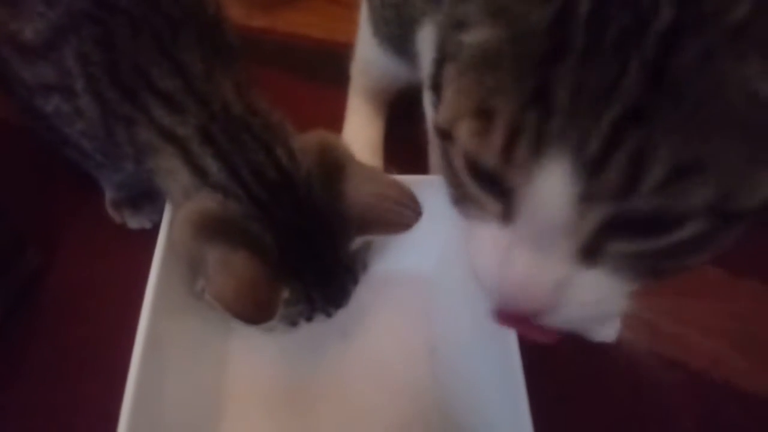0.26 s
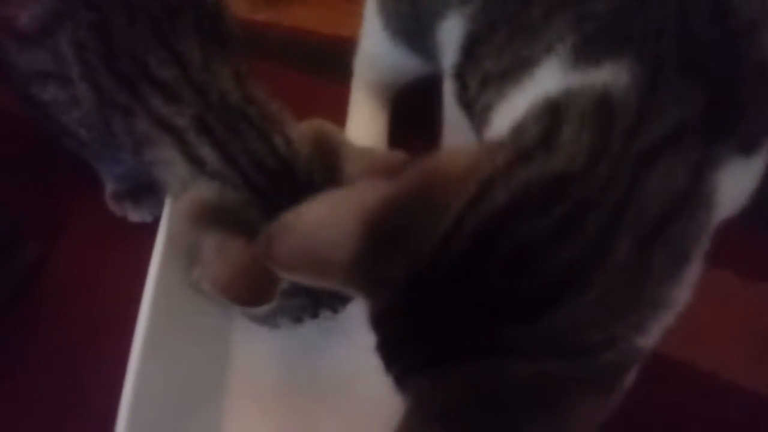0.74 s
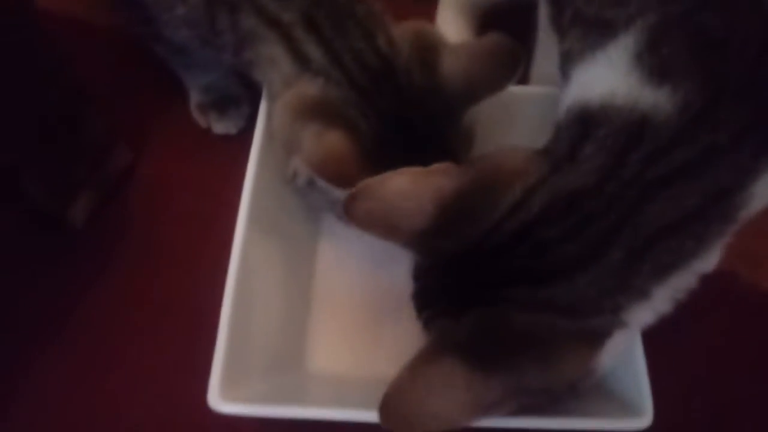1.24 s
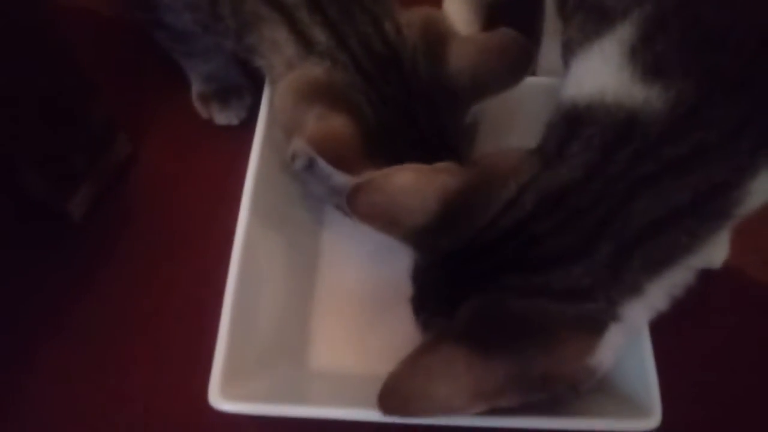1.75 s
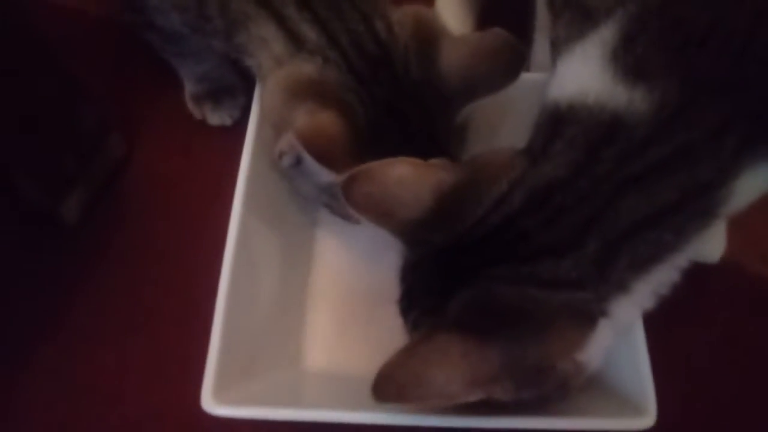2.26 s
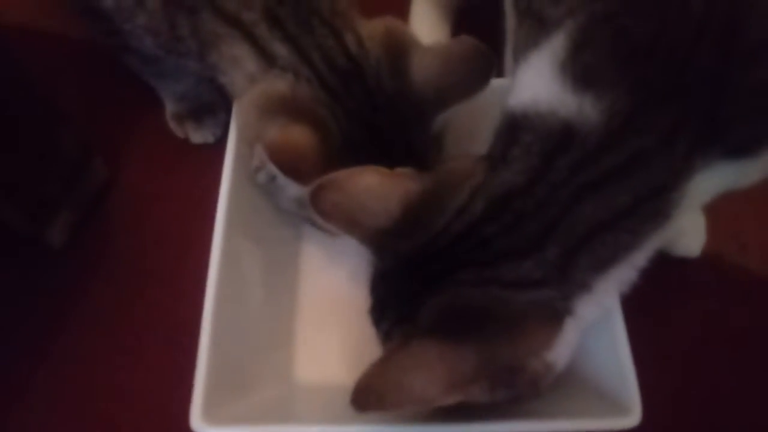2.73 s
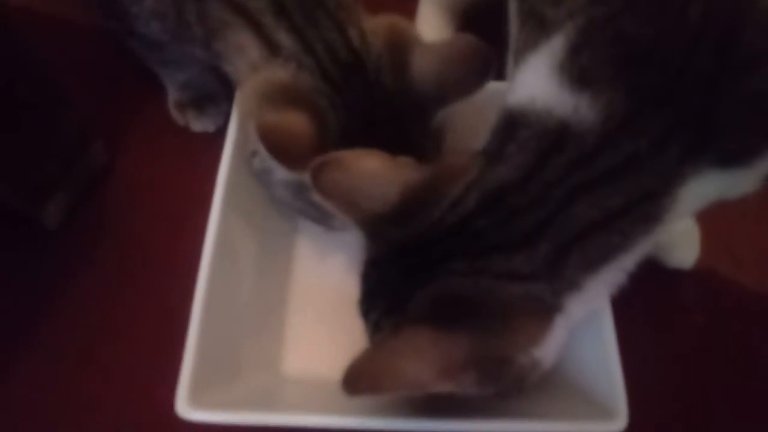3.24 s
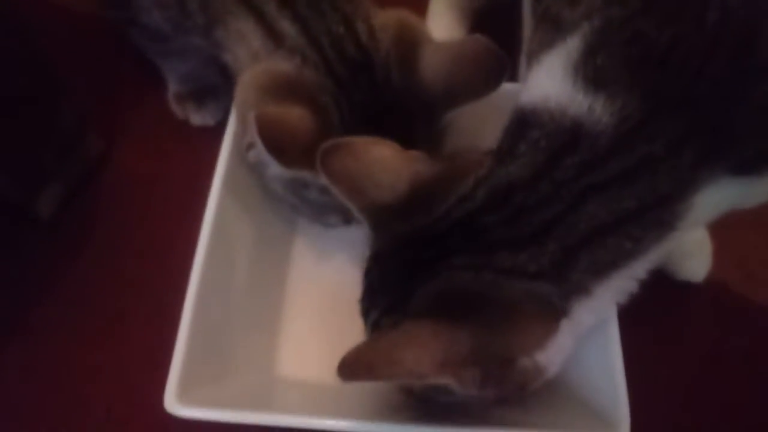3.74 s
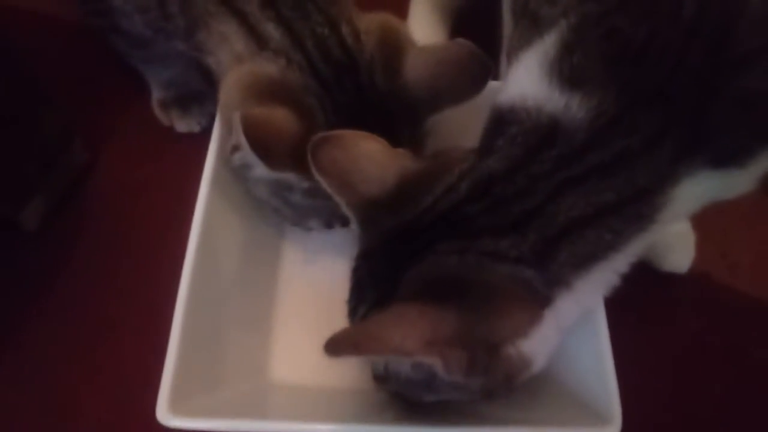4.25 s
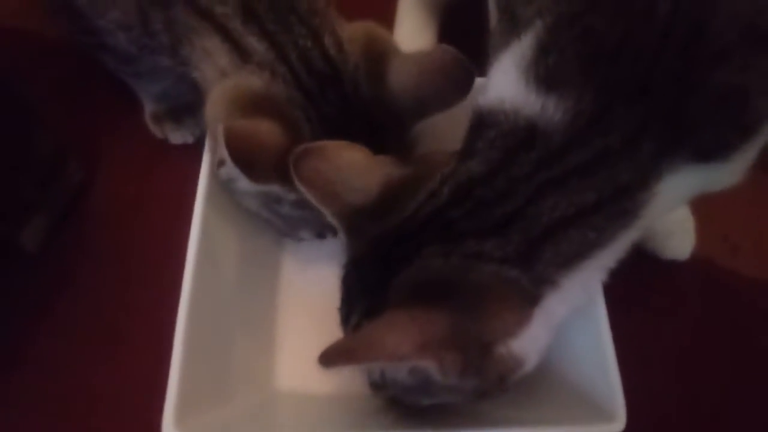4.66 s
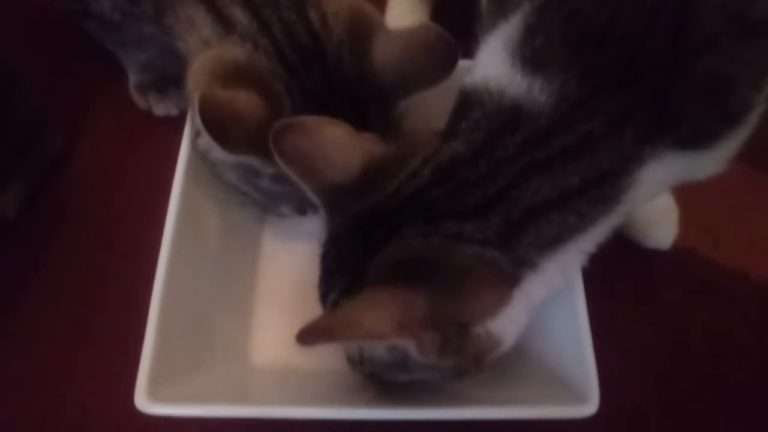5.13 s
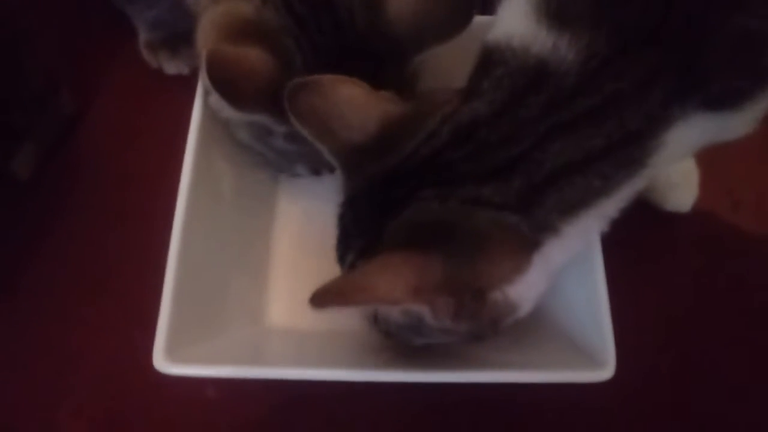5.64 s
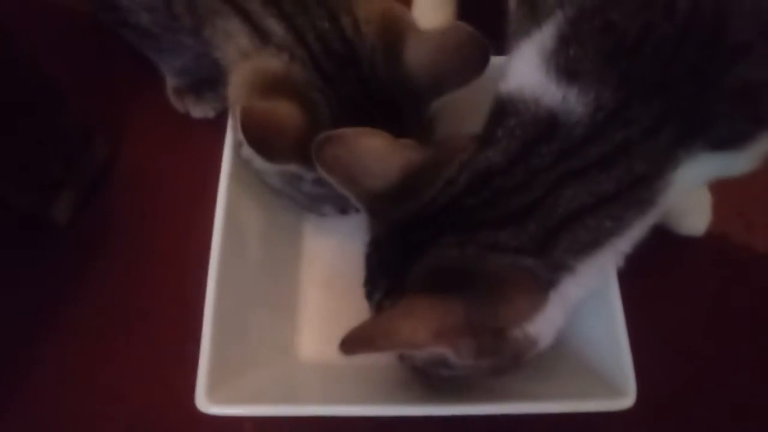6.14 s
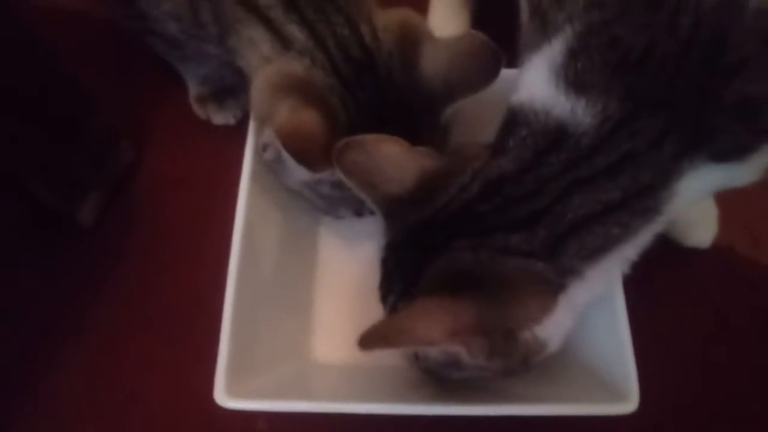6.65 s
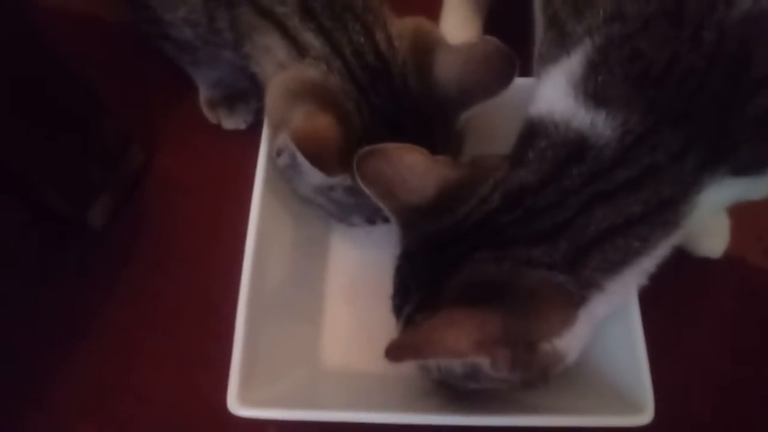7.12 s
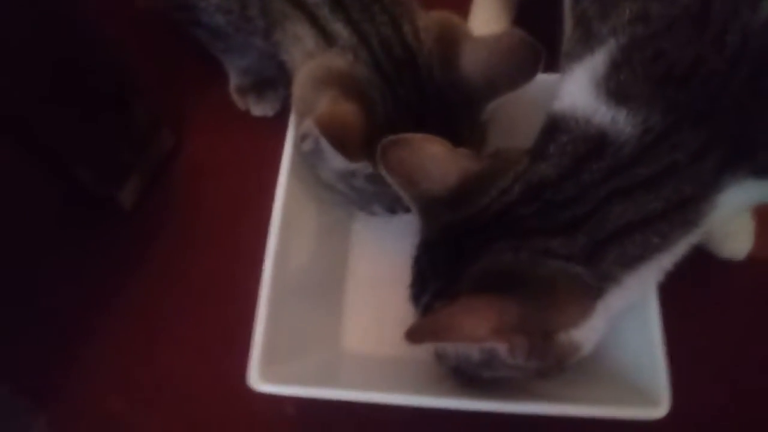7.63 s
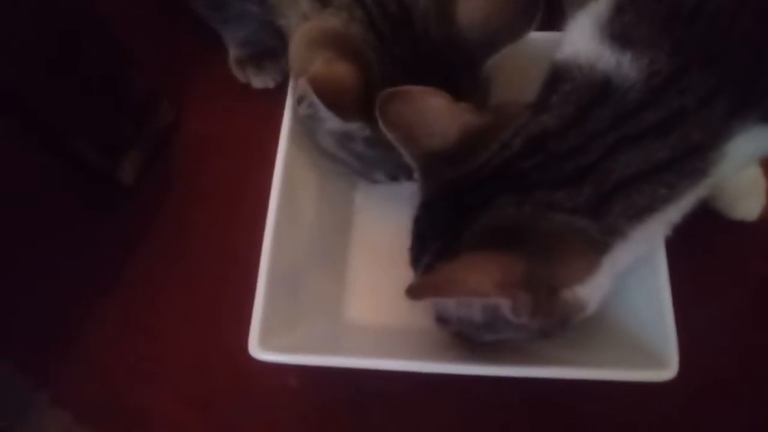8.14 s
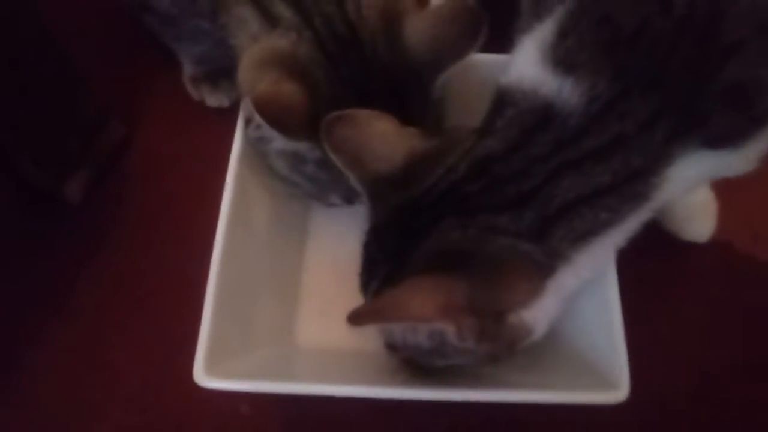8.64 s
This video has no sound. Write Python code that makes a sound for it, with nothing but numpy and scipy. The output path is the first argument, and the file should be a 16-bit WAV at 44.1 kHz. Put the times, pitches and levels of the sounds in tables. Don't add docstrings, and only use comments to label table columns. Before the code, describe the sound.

Two kittens lap milk from a ceramic dish close to a hand-held microphone in a quiet room. Sparse faint ticks come first, then quick irregular wet snaps, little pops and saliva crackle thicken. The sharpest clicks come just after five seconds. Fingers rub and knock the recorder case, low rumble swells later, and soft hiss with a faint electric buzz runs throughout.

```python
import sys
import numpy as np
from scipy import signal
from scipy.fft import rfft, irfft
from scipy.io import wavfile

SR = 44100
rng = np.random.default_rng(int(sys.argv[2]) if len(sys.argv) > 2 else 0)


def natural_amplitude(level_db):
    exponent = np.asarray(level_db, float) / 20
    return 10 ** exponent


def int16_out(signal):
    q = np.round(np.clip(np.atleast_2d(signal).T, -1, 1) * 32767)
    wavfile.write(sys.argv[1], SR, q.astype(np.int16))


N = 391608

# start in seconds, peak in dB, pitch in Hz.
SPRAY_SPECKS = [(1.5435, -48, 8580), (1.797, -39, 15530), (1.8367, -41, 9600), (2.1998, -42.5, 9300),
                (2.325, -43, 8800), (2.472, -41, 15400), (2.701, -47, 15530), (3.1937, -46, 14900),
                (3.207, -44, 11000), (3.504, -39, 15200), (3.936, -46, 9000), (4.164, -39, 8900),
                (4.374, -39, 15400), (5.011, -40, 15250), (5.175, -42, 11460), (5.25, -20.5, 9100),
                (5.25, -27, 15100), (5.3117, -51, 14450), (5.3237, -43, 11150), (5.9735, -41, 15000),
                (6.079, -44, 14700), (7.4415, -44.1, 10850), (8.5543, -43, 9700)]
# start in seconds, peak in dB.
TONGUE_TIPS = [(0.57, -42), (0.8368, -44), (0.913, -36), (1.197, -48), (1.2033, -42), (1.3314, -36),
               (1.357, -39.5), (2.228, -31), (2.391, -36), (2.438, -39), (3.143, -34.5), (3.792, -40),
               (4.0886, -35), (4.261, -34), (4.944, -36), (5.1561, -36), (5.291, -32.5), (6.7814, -39.5),
               (7.1606, -49), (8.165, -37), (8.313, -31), (8.3875, -39), (8.552, -29), (8.828, -30.5)]


def rms_one(x):
    return x / np.sqrt(np.mean(x ** 2) + 1e-20)


def peak_one(shapes):
    return shapes / np.abs(shapes).max(axis=1, keepdims=True)


def band(x, low_hz, high_hz):
    return signal.sosfilt(signal.butter(2, [low_hz, high_hz], "band", fs=SR, output="sos"), x)


def lowpass(x, order, hz):
    return signal.sosfilt(signal.butter(order, hz, fs=SR, output="sos"), x)


def drift(rate):
    r = np.exp(-80 * np.pi * rate / SR)
    noise = rng.standard_normal(N // 40 + 2002)
    slow = signal.lfilter([1], [1, -2 * r, r * r], noise)[2000:]
    return np.interp(np.arange(N) / 40, np.arange(len(slow)), rms_one(slow))


def ring(clicks, hz, t60):
    r, w = 1000 ** (-1 / (t60 * SR)), 2 * np.pi * hz / SR
    return signal.lfilter([0, np.sin(w)], [1, -2 * r * np.cos(w), r * r], clicks + 1e-18)


def place(times, shapes):
    out = np.zeros(N + shapes.shape[1])
    for s, shape in zip(times, shapes):
        i = max(int(s * SR), 0)
        out[i:i + len(shape)] += shape
    return out[:N]


def swells(rows, column):
    rows = np.array(rows)
    t = np.arange(-16384, 16384) / SR
    bells = np.exp(-(t / (0.46 * rows[:, 1:2])) ** 2) * natural_amplitude(rows[:, column:column + 1])
    return np.roll(place(rows[:, 0], bells), -16384)


def snap_levels():
    # start in seconds, lead ring in dB, spill into the other rings in dB.
    hollow_snaps = [(2.9466, -31, -17), (3.5694, -30.5, -16), (3.8362, -25, -17.5), (4.1787, -28, -20),
                    (4.4375, -36.5, -7), (4.6223, -37.5, -9), (4.681, -33, -18), (4.7539, -31.5, -11),
                    (4.9565, -26, -12), (4.9692, -30, -22), (5.2074, -23, -25), (5.2417, -27.5, -10.5),
                    (5.5264, -21.5, -34), (5.772, -27, -32), (5.7762, -26.5, -22), (5.7929, -32, -10),
                    (6.0284, -28.5, -24), (6.1023, -36, -9), (7.4232, -31, -32), (7.4275, -28.5, -34),
                    (8.2793, -24, -23), (8.3567, -32.5, -16), (8.5292, -33.5, -18)]
    middle_snaps = [(0.0442, -28.5, -15.5), (1.544, -30, -42), (1.7739, -20, -28), (2.709, -33.5, -12),
                    (2.8379, -40.5, 2), (3.2006, -24, -43), (3.323, -35, -19), (3.945, -22.5, -29),
                    (4.3082, -31, -14), (4.5348, -36, 5), (4.5396, -32, -20), (4.7991, -31.5, -11),
                    (5.024, -30, -7), (5.0782, -11, -9.5), (5.8188, -39, -3), (6.0334, -30, -4.5),
                    (6.0788, -26.5, -21), (7.185, -38.5, -19), (8.284, -31, -4.5), (8.3135, -38, -5),
                    (8.348, -30, -8)]
    bright_snaps = [(1.45, -32.5, 1.5), (1.7157, -23, -11), (1.723, -36.9, -6.2), (1.735, -31, -9),
                    (1.7649, -27, -22), (1.798, -31, -3), (1.968, -26, -9.5), (2.2111, -24.5, -5.5),
                    (2.4504, -16, -13), (2.456, -16, -26), (2.482, -31, -23), (2.859, -33, -7.8),
                    (3.1026, -27, -8), (3.1081, -21.5, -22), (4.0133, -21.5, -14.5), (4.1633, -32, -9),
                    (5.018, -30.5, -5), (5.25, -8.5, -13), (5.445, -34.5, -10), (5.8484, -28, -7)]
    # hollow ring in dB, middle ring in dB, bright ring in dB, airy rings in dB.
    spill_lean = [
        (0, 8, 6.5, -13),
        (0.5, 0, 0, -50),
        (-3.5, -10.5, 0, -30),
    ]
    times, levels = [], []
    for lead, (rows, lean) in enumerate(zip([hollow_snaps, middle_snaps, bright_snaps], spill_lean)):
        s, db, spill_db = np.array(rows).T[:, :, None]
        rings = db + spill_db + np.array(lean)
        rings[:, lead] = db[:, 0]
        times.append(s[:, 0])
        levels.append(rings)
    return np.concatenate(times), np.concatenate(levels)


def snaps(rise_s=0.00028, echo_db=-13, tail_db=-22, tail_s=0.0018):
    # pitch in Hz, pitch scatter from 0 to 1, time to fade by 60 dB in seconds.
    snap_rings = [
        (2407, 0.24, 0.0094),
        (4530, 0.05, 0.0057),
        (6487, 0.07, 0.0089),
        (10750, 0.8, 0.01),
        (15000, 0.36, 0.0011),
    ]
    times, rows = snap_levels()
    t = np.arange(1024) / SR
    levels = np.column_stack([rows, rows[:, -1] + 3.2])
    draws = rng.standard_normal((len(rows), 5, 2, 2))
    tails = rng.standard_normal((len(rows), len(t)))
    shapes = 0
    for k, (hz, scatter, t60) in enumerate(snap_rings):
        pitch = hz * np.exp(1.35 * scatter * np.tanh(draws[:, k, :, :1]))
        pair = np.sin(2 * np.pi * (pitch * t + draws[:, k, :, 1:])).sum(axis=1)
        body = pair * 1000 ** (-t / t60) * (1 - np.exp(-t / rise_s)) ** 2
        tail = band(tails, 0.99 * hz, 1.0 * hz) * np.exp(-t / tail_s) * natural_amplitude(tail_db)
        shapes = shapes + natural_amplitude(levels[:, k:k + 1] - 2.53) * (peak_one(body) + tail)
    crack = band(band(np.exp(-t / 0.00005), 2650, 5200), 1800, 5200)
    crack_db = levels[:, :3].mean(axis=1, keepdims=True) + 5.5
    shapes = shapes + natural_amplitude(crack_db) * np.roll(crack / crack.max(), 12)
    shapes = shapes + natural_amplitude(echo_db) * np.roll(shapes, int(0.0011105 * SR), axis=1)
    return place(times - 0.0006, shapes)


def sized(rows, hz):
    return np.column_stack([rows, np.full(len(rows), hz)])


def pips(cycles=13, scatter=0.14):
    # start in seconds, peak in dB, pitch in Hz.
    bubbles = [(1.4564, -41, 2660), (3.0414, -33.5, 2230), (3.047, -37.5, 1990), (3.3079, -37.5, 2170),
               (3.6717, -28, 2880), (3.8404, -33, 2500), (3.8435, -30.5, 2150), (4.1713, -36, 2040),
               (4.434, -33, 2530), (4.6922, -29, 2080), (4.8433, -30, 2500), (4.9089, -28, 2820),
               (4.951, -35, 2000), (5.1931, -33, 2450), (5.5293, -34, 3000), (5.5482, -33.5, 2180),
               (6.2824, -28, 2350), (6.2862, -33, 2230), (6.6153, -34.5, 2040), (6.6212, -36, 2060),
               (7.438, -39, 2590), (7.7446, -29.5, 2050), (7.7525, -34, 2630), (7.7559, -36, 2530)]
    # start in seconds, peak in dB.
    droplets = [(1.6782, -38), (1.6899, -40), (2.1924, -34), (2.3135, -28), (2.8823, -34), (2.8921, -30.6),
                (3.0802, -27), (3.1937, -40), (3.318, -37.2), (3.6132, -30), (3.6285, -38), (3.6426, -35),
                (3.9493, -36), (3.9605, -29), (4.3872, -33), (4.4844, -37), (5.3231, -33.5), (6.0981, -30),
                (7.2775, -35.5), (7.4854, -35), (7.5444, -33), (8.0592, -33), (8.5943, -35.5)]
    threads = [(0.5756, -31), (0.7436, -34), (1.2405, -31.5), (1.6734, -37), (1.695, -40), (1.729, -29),
               (1.8368, -30.5), (2.2002, -36), (2.202, -31), (2.2692, -33), (2.79, -48), (2.8647, -30),
               (2.997, -32), (3.0083, -51), (3.204, -27), (3.7414, -34), (4.1594, -33.5), (5.3344, -35),
               (5.3448, -29), (5.358, -39), (5.367, -33), (8.6565, -29)]
    droplet_hz, thread_hz = 4340, 6340
    port_drop_hz = 7600
    pops = [bubbles, sized(droplets, droplet_hz), sized(threads, thread_hz), SPRAY_SPECKS]
    s, db, hz = np.concatenate(pops).T[:, :, None]
    t = np.arange(512) / SR
    draws = rng.standard_normal((len(s), 3, 1))
    turns = hz * np.exp(0.026 * draws[:, 2]) * t * (1 + 0.00057 * hz * t)
    near_turns = turns * np.exp(scatter * np.tanh(draws[:, 1]))
    pair = np.sin(2 * np.pi * (turns + draws[:, 0])) + 1.09 * np.sin(2 * np.pi * (near_turns + draws[:, 2]))
    body = pair * 1000 ** (-hz ** 0.5 * 60 * t / cycles) * (1 - np.exp(-t / 0.00039)) ** 2
    body = np.where(hz < port_drop_hz, lowpass(body, 6, port_drop_hz), body)
    body = natural_amplitude(db + 0.1) * peak_one(body)
    after = s[:, 0] + rng.uniform(0.002, 0.007, len(s))
    return place(s[:, 0] - 0.0006, body) + natural_amplitude(-9.5) * place(after, body)


def licks(spread_s=0.0014, scatter=0.037, t60_s=0.0084, rise_s=0.00012, trail_db=-4):
    # start in
    # seconds, peak in dB, pitch in Hz.
    lick_rows = [(0.2278, -48.5, 3100), (0.5689, -44, 1930), (0.5761, -52, 1890), (1.4498, -44.5, 1920),
                 (1.6668, -46, 2070), (1.8061, -49, 2410), (2.203, -41, 1920), (2.4562, -36, 2100),
                 (2.7777, -42, 2640), (2.7893, -45.5, 2000), (2.8851, -35.5, 2700), (2.933, -39.5, 1820),
                 (2.9794, -44, 2580), (2.9925, -50, 2070), (3.06, -42, 2760), (3.2239, -43, 2090),
                 (3.5331, -45, 1470), (3.6376, -43, 2080), (3.7674, -54, 2100), (4.1324, -41, 3370),
                 (4.2028, -44, 2240), (4.2543, -44, 2240), (4.2623, -39, 3270), (4.4256, -42, 1940),
                 (4.4561, -47, 2760), (4.7927, -46, 2100), (4.98, -44, 2350), (5.0395, -47, 2930),
                 (5.0786, -13.5, 2340), (5.2165, -47, 2070), (5.2245, -53, 2240), (5.3449, -45, 2760),
                 (5.4756, -48, 2630), (5.6657, -45, 3000), (5.6882, -46, 2800), (5.6925, -42, 3270),
                 (5.7056, -40.5, 2760), (6.5843, -45, 3250), (6.847, -55, 1890), (6.8941, -45.5, 1890),
                 (7.1626, -41.5, 2070), (7.3564, -45, 2480), (7.4108, -45, 3270), (7.4159, -42, 2130),
                 (7.7025, -47.5, 2900), (7.9463, -49, 2100), (8.0022, -47, 2070), (8.0102, -46, 2070),
                 (8.0225, -52, 1890), (8.5362, -40, 2040), (8.5464, -41, 2620), (8.558, -49, 1890),
                 (8.5986, -60, 2760), (8.7133, -46.5, 1680),
                 (0.8378, -40.5, 5500), (1.1968, -42, 4330), (1.206, -35, 4260), (1.2484, -31, 5340),
                 (1.356, -35, 5450), (1.4386, -39, 6200), (1.5443, -39, 7580), (1.69, -41, 4000),
                 (1.748, -33, 6500), (1.7741, -32, 6740), (1.805, -35.5, 4480), (1.8612, -40, 6720),
                 (2.0281, -39, 6450), (2.483, -43, 4650), (2.6647, -39, 4200), (2.8, -43, 6370),
                 (3.0087, -33, 6740), (3.1436, -42, 6550), (3.3234, -38.5, 6400), (3.385, -38.5, 6550),
                 (3.5098, -43, 4160), (3.5875, -40, 6400), (3.6384, -42, 6370), (3.7, -40, 6240),
                 (3.8444, -38, 4820), (3.9362, -39, 7100), (4.044, -40, 4440), (4.2442, -39, 4310),
                 (4.2551, -40, 3480), (4.2935, -41, 4800), (4.3088, -41, 6170), (4.375, -37.5, 6600),
                 (4.6317, -42, 6670), (4.7644, -37, 4650), (5.1747, -42, 4480), (5.1831, -42, 4480),
                 (5.3159, -41, 6720), (5.3474, -39, 4480), (5.778, -38, 3870), (5.8195, -39, 5700),
                 (5.8415, -40, 4600), (6.0738, -42, 7500), (7.002, -36.5, 4130), (7.0744, -38, 4250),
                 (7.4246, -37.5, 4000), (7.4406, -41, 4310), (7.59, -38.5, 4370), (8.028, -45, 7580),
                 (8.0276, -41, 5440), (8.3722, -36.5, 5510), (8.388, -40, 4900), (8.468, -40, 4450),
                 (8.537, -39, 5240), (8.5653, -40, 4310), (8.7047, -42, 3670), (8.711, -38, 3600),
                 (8.8333, -42, 7600), (8.833, -38, 4200),
                 (0.3454, -48, 15500), (1.301, -53, 10900), (1.5499, -51, 11400), (1.5594, -53, 11020),
                  (1.7212, -46, 9300), (1.735, -48, 9820), (1.735, -48, 15330), (1.7538, -48, 9130),
                  (1.7604, -47, 9500), (1.7647, -44, 14990), (1.83, -51, 9200), (2.094, -48, 8600),
                  (2.3162, -50, 11100), (2.3334, -47, 8650), (2.4548, -49, 12900), (2.4722, -53, 9900),
                  (2.557, -49, 9450), (2.567, -51, 9400), (2.7015, -51, 15400), (2.782, -49, 11460),
                  (3.1877, -47, 14810), (3.2065, -41, 15160), (3.2784, -47, 14990), (3.5171, -46, 8900),
                  (3.9358, -53, 10500), (3.9454, -47, 10100), (4.1636, -47, 13440), (4.6085, -49, 8900),
                  (4.816, -50, 15330), (6.0785, -49, 8790), (7.188, -51, 10940), (8.0276, -51, 10510),
                  (8.2409, -55, 11540), (8.6574, -51, 10600)]
    odd_ones = [
        (0.152, -54, 10600),
        (0.585, -45, 4440),
        (3.89, -51.5, 704),
        (5.8058, -33, 460),
        (5.8046, -36.5, 1260),
    ]
    s, db, hz = np.concatenate([lick_rows, odd_ones]).T[:, :, None]
    draws = rng.standard_normal((len(s), 3, 3, 1))
    fade = (hz / 3000) ** 0.79 * natural_amplitude(0.3 * np.maximum(db + 31, 0)) / t60_s
    shapes = 0
    for k in range(3):
        delay = k * spread_s * np.exp(0.43 * draws[:, k, 0])
        t = np.maximum(np.arange(768) / SR - delay, 0)
        pitch = hz * np.exp(k * scatter * np.tanh(draws[:, k, 1]))
        tone = np.sin(2 * np.pi * (pitch * t + draws[:, k, 2]))
        shapes = shapes + natural_amplitude(k * trail_db) * tone * 1000 ** (-t * fade) * (1 - np.exp(-t / rise_s)) ** 2
    return place(s[:, 0] - 0.001, natural_amplitude(db + 0.5) * peak_one(shapes))


def tip_ticks(decay_s=0.00028, air_db=-22, speck_body_db=-2, speck_air_db=-6):
    tips, specks = np.array(TONGUE_TIPS), np.array(SPRAY_SPECKS)
    s = np.concatenate([tips[:, 0], specks[:, 0]])
    body_db = np.concatenate([tips[:, 1], specks[:, 1] + speck_body_db])[:, None]
    top_db = np.concatenate([tips[:, 1] + air_db, specks[:, 1] + speck_air_db])[:, None]
    t = np.arange(256) / SR
    burst = rng.standard_normal((len(s), len(t))) * t * np.exp(-t / decay_s)
    body = band(band(burst, 2700, 6800), 1600, 5400)
    low_air = band(band(burst, 8600, 11000), 8300, 11500)
    high_air = band(band(burst, 14300, 15800), 14000, 16000)
    shapes = natural_amplitude(body_db) * peak_one(body) + natural_amplitude(top_db) * peak_one(low_air + 2 * high_air)
    return place(s - 0.0007, shapes)


def crackle(modes, per_s, spread_db, cycles, detune=0.087):
    sizes = natural_amplitude(spread_db * np.minimum(rng.exponential(1, N), 4)) * rng.choice([-1, 1], N)
    born = rng.random(N) < per_s * natural_amplitude(3.5 * drift(60)) / SR
    pitches = [hz * step for hz in modes for step in (1 - detune, 1, 1 + detune)]
    dealt = rng.integers(0, len(pitches), N)
    rings = sum(ring(sizes * born * (dealt == k), hz, cycles / hz) for k, hz in enumerate(pitches))
    return rms_one(band(rings, 0.78 * modes[0], 1.13 * modes[-1]))


def slurps_and_scrapes():
    # middle in
    # seconds, length in seconds, level in dB, brightness in dB from one ring to the next.
    drags_and_scrapes = [(0.707, 0.12, -71, -3), (1.456, 0.023, -59.5, -2), (1.736, 0.19, -60.5, 0.5),
                         (2.47, 0.048, -77, 5.5), (2.782, 0.011, -63, 4), (3.204, 0.0086, -70, 13),
                         (3.292, 0.021, -72, 5.5), (3.523, 0.023, -61.5, -3), (3.688, 0.19, -66, -4.5),
                         (4.478, 0.023, -61, -1.5), (4.704, 0.029, -57, -3), (5.192, 0.021, -57, -5.5),
                         (5.382, 0.1, -72.5, 5), (5.586, 0.031, -57.5, 0.5), (5.655, 0.091, -63.5, -6),
                         (5.78, 0.14, -66.5, -7), (6.63, 0.037, -61.5, -9), (7.182, 0.0072, -50, -6.5),
                         (7.747, 0.028, -57, -26), (8.317, 0.13, -63, -3.5), (8.542, 0.059, -58, 0)]
    # level of a plain drag or scrape in dB, then how far it follows
    froth_db = [-0.5, 5, 7, -10.5]
    froth_lean = [-0.32, 0.1, 1.6, 2]
    froths = [crackle([1750, 2200, 2700], per_s=1200, spread_db=2.0, cycles=15),
              crackle([3700, 4500], per_s=1400, spread_db=3.0, cycles=11),
              crackle([6000, 6600], per_s=2000, spread_db=5.5, cycles=26),
              crackle([9200, 11500, 14600], per_s=2000, spread_db=5.0, cycles=9.8)]
    s, length, db, bright_db = np.transpose(drags_and_scrapes)
    total = 0
    for froth, base_db, lean in zip(froths, froth_db, froth_lean):
        rows = np.column_stack([s, length, db + base_db + lean * bright_db])
        total = total + froth * swells(rows, column=2)
    return natural_amplitude(5.5) * total


def wetness(wet_s=0.037, dry_db=-5.5):
    times = np.concatenate([snap_levels()[0], np.array(TONGUE_TIPS)[:, 0]])
    near = swells(np.column_stack([times, np.full(len(times), wet_s), 0 * times]), column=2)
    return natural_amplitude(dry_db) + np.tanh(near)


def loose_froth(wet_db):
    froth = crackle([2040, 2760, 3490, 4280], per_s=1100, spread_db=4.0, cycles=33, detune=0.057)
    spray = crackle([8800, 11300, 14900, 15400], per_s=200, spread_db=6.0, cycles=65)
    ticks = crackle([2300, 4300, 5600], per_s=70, spread_db=0.5, cycles=4.3)
    froth = natural_amplitude(wet_db - 2.5 + 2.7 * drift(9.3)) * froth
    spray = natural_amplitude(wet_db - 23 + 7.0 * drift(9.4)) * spray
    return wetness() * (froth + spray + natural_amplitude(wet_db - 11.5) * ticks)


def knocks():
    # start in seconds, low swing in dB, pitch in Hz, sharp edge in dB.
    knock_rows = [(1.692, -32, 100, -45), (1.7516, -38, 108, -37), (1.7995, -24, 129, -20.5),
                  (2.5502, -45.5, 240, -44.5), (3.581, -50, 81.6, -51), (4.33, -47.5, 199, -74),
                  (4.356, -44.5, 123, -78), (4.6256, -31, 274, -60), (4.633, -37, 99, -70),
                  (4.817, -45, 188, -45), (5.0785, -28.5, 324, -16.5), (5.4304, -43, 139, -62),
                  (5.574, -36.5, 103, -63), (5.592, -38.5, 100, -62), (5.8058, -54, 298, -39),
                  (5.8204, -42, 111, -38), (5.936, -33, 114, -49), (7.765, -39.5, 129, -56),
                  (8.3123, -38.5, 125, -36), (8.3337, -46, 120, -36), (8.358, -37.5, 118, -28.5),
                  (8.373, -40, 108, -34.5)]
    rows = np.array(knock_rows)
    t = np.arange(3072) / SR
    cycles = rows[:, 2:3] * t
    swing = np.sin(2 * np.pi * cycles) * cycles * np.exp(-cycles * 3.18) * 5.55
    edge = band(np.exp(-t / 0.0007), 286, 2080)
    lows = place(rows[:, 0] - 0.663 / rows[:, 2], swing * natural_amplitude(rows[:, 1:2] + 6.0))
    edges = place(rows[:, 0] - 0.0006, -natural_amplitude(rows[:, 3:4] + 2.5) * edge / edge.max())
    return band(lows, 76, 620) + edges


def rubs():
    # middle in seconds, length in seconds, stick-slip in dB, hum of the case in dB.
    rub_rows = [
        (1.74, 0.19, -51, -66),
        (1.9, 0.31, -91, -66),
        (3.1, 0.66, -71.5, -72),
        (4.8, 0.21, -66.5, -81),
        (5.59, 0.056, -57, -81),
        (5.75, 1, -75, -66),
        (8.32, 0.17, -53.5, -68),
    ]
    slips = (rng.random(N) < 450 / SR) * natural_amplitude(2.5 * np.minimum(rng.exponential(1, N), 4))
    spikes = band(slips, 210, 5700) + natural_amplitude(16) * band(slips, 86, 1040)
    hum = band(rng.standard_normal(N), 477, 628)
    return swells(rub_rows, column=2) * rms_one(spikes) + swells(rub_rows, column=3) * rms_one(hum)


def rumble(level_db):
    return natural_amplitude(level_db - 8 + 2.8 * drift(4.3)) * rms_one(band(rng.standard_normal(N), 59.5, 162))


def whine(buzz_hz=60.348):
    tick_rows = [
        (.197, .72),
        (.448, -.5),
        (.48, 1),
    ]
    opens_s, open_time_s = 5.64, 0.37
    width_db = np.interp(np.arange(N) / SR, [opens_s, opens_s + open_time_s], [-1.5, 3])
    ticks = np.zeros(N)
    for share, strength in tick_rows:
        at = (np.arange(int(N / SR * buzz_hz) - 1) + share) / buzz_hz * SR
        np.add.at(ticks, at.astype(int), strength * (1 - at % 1))
        np.add.at(ticks, at.astype(int) + 1, strength * (at % 1))
    ticks = lowpass(ticks, 12, 7000)
    port = band(ticks, 6100, 6950)
    wide = band(band(ticks, 3700, 6000), 3400, 7500)
    return natural_amplitude(-51.5) * port / port.max() - natural_amplitude(1.6 * width_db - 49.5) * wide / wide.max()


def hiss(level_db=-59):
    # pitch in Hz, level in dB per Hz.
    hiss_colour = [(25, -16), (50, -6), (110, 2.5), (1240, -12), (1940, -13.5), (3000, -12), (4300, -7),
                   (5300, -8), (6600, -6.5), (7200, -12), (8200, -28), (13600, -32.5), (15000, -17),
                   (15900, -21)]
    hz = np.fft.rfftfreq(N, 1 / SR) + 1
    points = np.array(hiss_colour)
    colour = natural_amplitude(np.interp(np.log(hz), np.log(points[:, 0]), points[:, 1])) * (hz < points[-1, 0])
    air = rms_one(irfft(rfft(rng.standard_normal(N)) * colour, N))
    edges = 1500 * 2 ** np.arange(0, 2.1, 0.4)
    patches = sum((natural_amplitude(5.8 * drift(4.6)) - 1) * band(air, low, high) for low, high in zip(edges, edges[1:]))
    return natural_amplitude(level_db - 4.0) * (air + patches)


def scene():
    # time in seconds, wet crackle in dB, handling rumble in dB.
    stirring = [(0.0, -98, -85), (0.56, -112, -82), (1.66, -64.5, -73), (2.78, -56, -92), (4.1, -59.5, -61),
                (4.35, -60.5, -54.5), (4.5, -57, -65), (5.2, -60, -67), (5.6, -56.5, -50.5),
                (6.25, -60, -47.5), (6.6, -57, -58.5), (6.85, -55.5, -54.5), (7.1, -58.5, -74),
                (8.05, -60, -75), (8.3, -79, -46.5), (8.5, -52.5, -69), (8.65, -51, -54.5),
                (8.88, -53.5, -64)]
    s, *columns = np.transpose(stirring)
    wet_db, rumble_db = [np.interp(np.arange(N) / SR, s, c) for c in columns]
    lapping = snaps() + pips() + slurps_and_scrapes() + tip_ticks() + loose_froth(wet_db)
    handling = knocks() + rubs() + rumble(rumble_db)
    return (band(lapping, 910, 20000) + licks() + handling + hiss() + whine())[None]


def top_cut(x):
    return signal.sosfilt(signal.butter(12, 17000, fs=SR, output="sos"), x)


def record(dry):
    return top_cut(lowpass(dry, 8, 16000))


dry = scene()
out = record(dry)
int16_out(out)
```